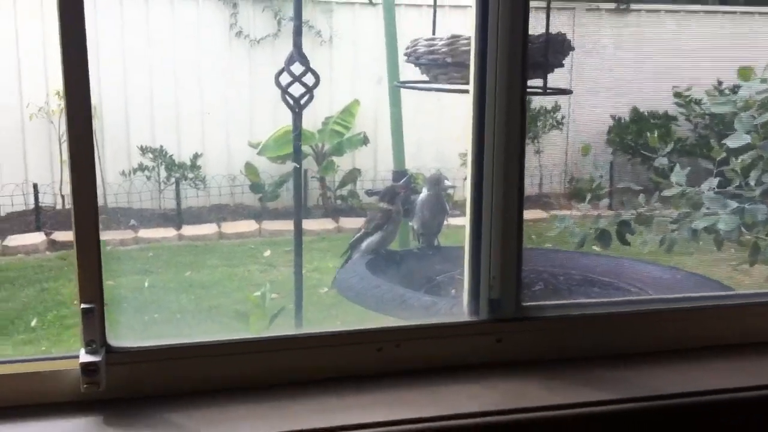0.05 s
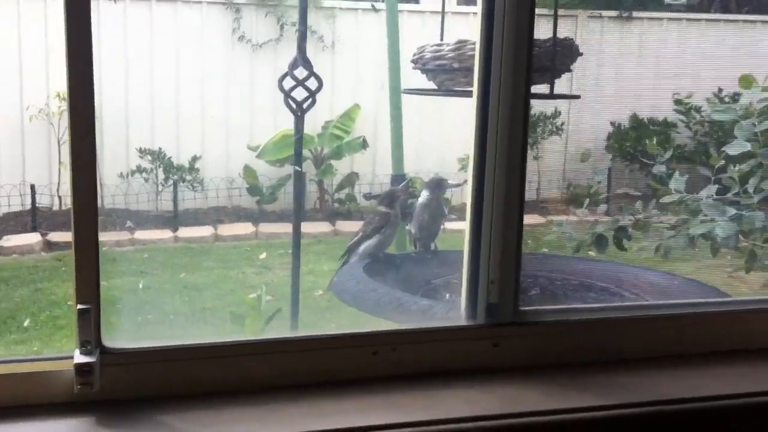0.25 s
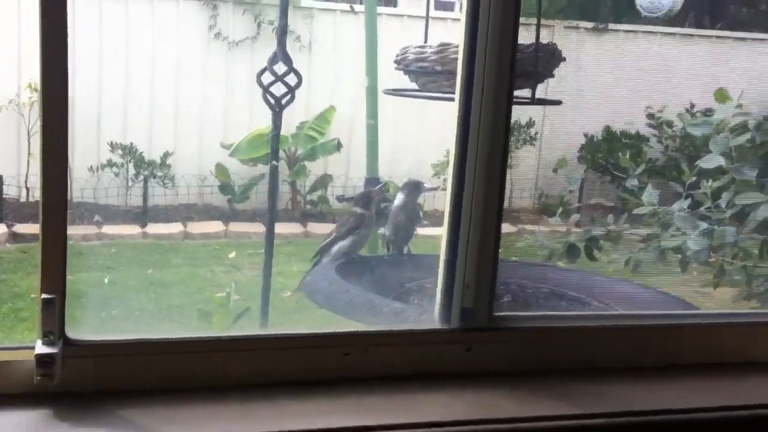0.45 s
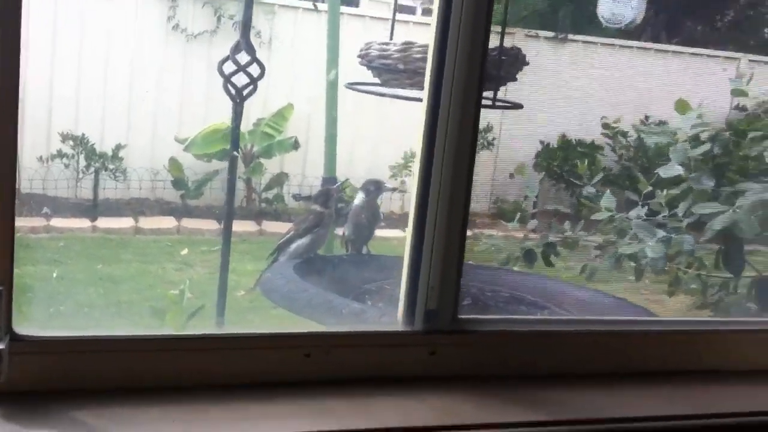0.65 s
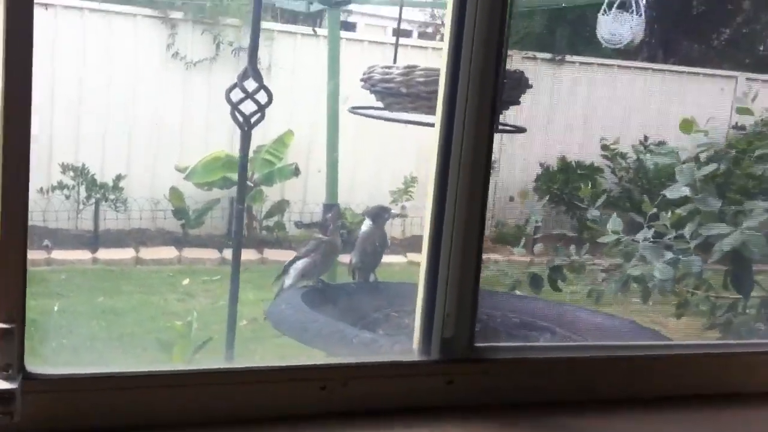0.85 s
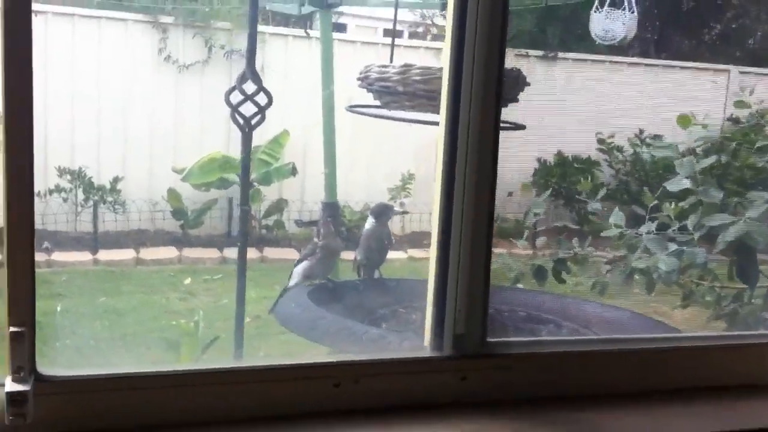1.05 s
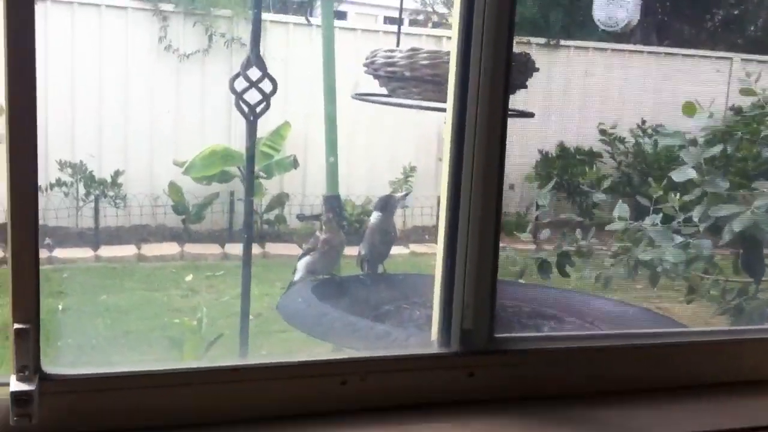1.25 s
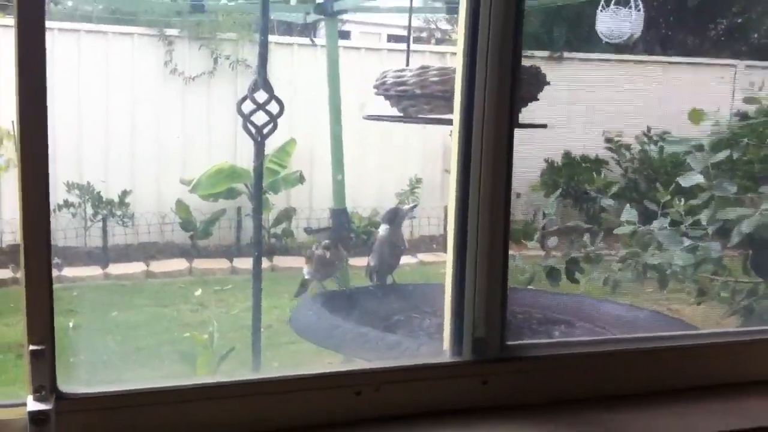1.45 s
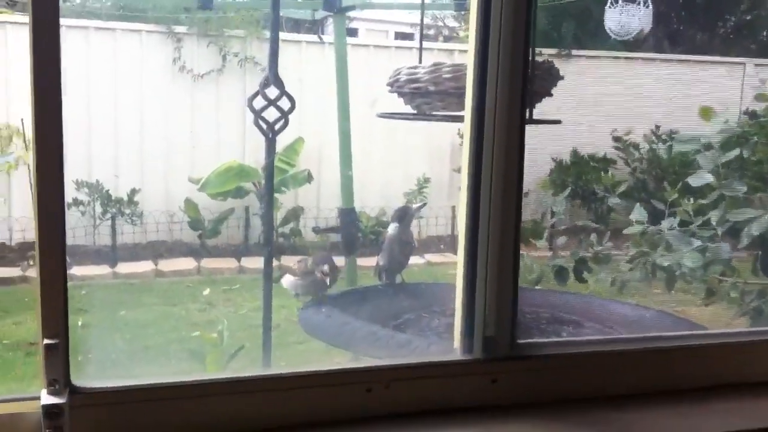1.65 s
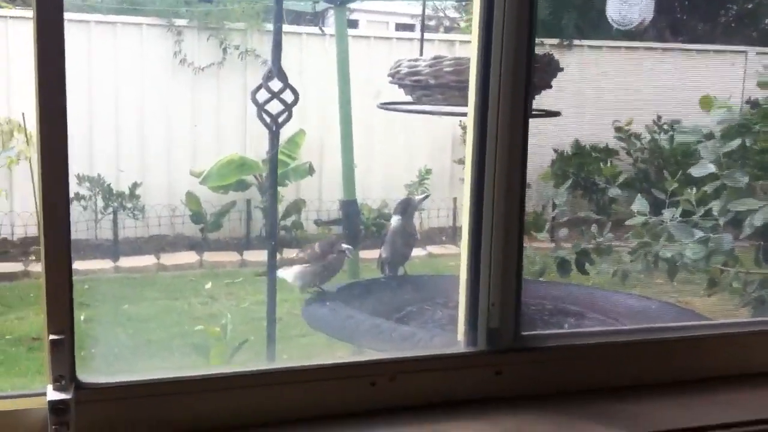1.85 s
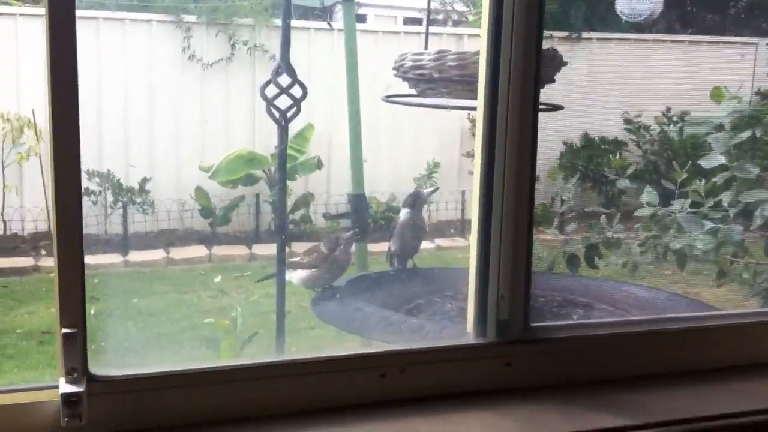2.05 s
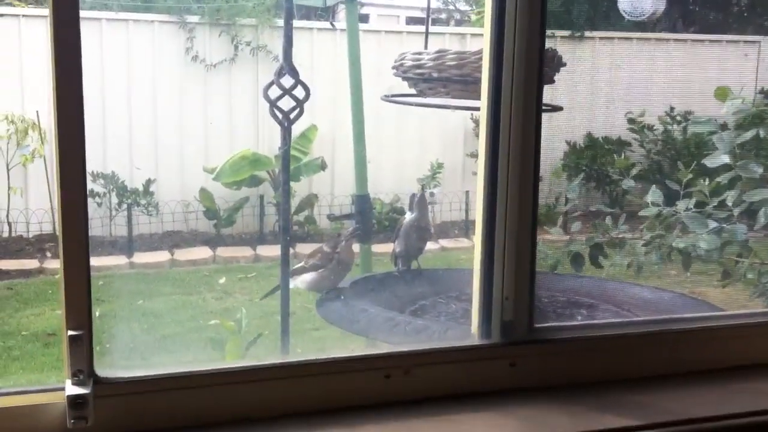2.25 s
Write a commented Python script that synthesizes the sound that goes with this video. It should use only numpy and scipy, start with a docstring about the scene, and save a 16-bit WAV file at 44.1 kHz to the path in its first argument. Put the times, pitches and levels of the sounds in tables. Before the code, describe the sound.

A young bird gives harsh, rising squawks in a garden, heard through a window.

```python
"""A young bird's begging squawks at a garden bird bath, heard from a microphone indoors behind a window.
Each squawk is a reedy tone from the syrinx that climbs in pitch, turns harsh on the way up and clears
at the top. One is dying away at the start and five more follow. Walls return them as early echoes and
a short ring; a quiet low rush and hum lie underneath."""
import sys
import numpy as np
from scipy import signal
from scipy.fft import rfft, irfft
from scipy.io import wavfile

SR = 44100
rng = np.random.default_rng(int(sys.argv[2]) if len(sys.argv) > 2 else 0)


def generate_wav(sig):
    """Save sig (samples, or channels by samples) to the path in sys.argv[1] as 16-bit PCM at SR."""
    pcm = np.round(np.clip(np.atleast_2d(sig).T, -1, 1) * 32767).astype(np.int16)
    wavfile.write(sys.argv[1], SR, pcm)


N = 105840
LEAD = SR // 4   # spare samples at each end, so a squawk can begin before 0 s
TIME = np.arange(-LEAD, N + LEAD) / SR
CUTOFF_HZ = 15750

# One curve a squawk. Each row: time in seconds, pitch in Hz, relative level in dB,
# roughness from 0 to 1, treble lift in dB.
FADING = [(-.12, 1350, -42.5, .5, 0), (-.06, 1614, -42, 0.42, -6), (-.025, 1650, -56.5, 0.2, 2)]
FIRST = [(.193, 1107, -47.5, 0.15, -8), (.207, 1148, -52, 0.089, 2), (.242, 1214, -44.5, 0.086, -6),
         (.272, 1253, -52, 0.26, -4), (.285, 1308, -45.5, 0.41, -4), (.303, 1386, -45.5, 0.53, -5),
         (.314, 1443, -38.5, 0.085, -1.5), (.335, 1509, -40, 0.19, -2.5), (.347, 1500, -46.5, 0.24, -2)]
SECOND = [(.836, 863, -59.5, 0.43, 7), (.856, 991, -48, 0.12, 7), (.897, 1055, -42.5, 0.062, 6),
          (.91, 1061, -48.5, 0.085, 12), (.972, 1199, -44.5, 0.13, -5), (1.012, 1309, -47, 0.44, -8),
          (1.042, 1429, -38, 0.19, 0), (1.056, 1446, -53.5, 0.62, 4)]
THIRD = [(1.405, 896, -67.5, 0.64, -7), (1.428, 1059, -46, 0.36, 5), (1.448, 1104, -49, 0.08, 8),
         (1.468, 1130, -42.5, 0.086, 1), (1.505, 1202, -43.5, 0.072, 0), (1.534, 1279, -48, 0.25, 2),
         (1.564, 1429, -41.5, 0.34, -4.5), (1.594, 1662, -41, 0.23, 0.5), (1.614, 1681, -51, 0.38, 0)]
FOURTH = [(1.733, 1144, -46.5, 0.15, 7.6), (1.744, 1166, -47.5, 0.2, 12), (1.758, 1207, -48.5, .12, 4),
          (1.785, 1239, -44, 0.2, 2), (1.816, 1354, -49, 0.39, 2.5), (1.848, 1463, -43, 0.2, 1),
          (1.864, 1517, -48.5, 0.11, 2.8)]
FIFTH = [(1.984, 1156, -50.5, 0.59, 3), (1.997, 1212, -47, 0.13, 11), (2.015, 1217, -42.5, 0.073, 5.4),
         (2.05, 1276, -46, 0.26, 8.9), (2.07, 1316, -48.5, 0.39, 8.4), (2.09, 1410, -44.5, 0.27, 5.8),
         (2.122, 1475, -54.5, .4, 3)]


def begging_bird():
    """The bird out at the bath: six squawks, each with its own climb and colour."""
    # Each row: curve, factor on the throat's resonance frequencies, extra dB on the fundamental,
    # then extra dB on harmonics 4, 6 and 8 early in the squawk.
    squawks = [(FADING, 1.0, 0, 0, 0, 0), (FIRST, 0.96, -1.7, -0.54, -4.5, -0.92),
               (SECOND, 0.97, 0, 3.4, 5.6, 1), (THIRD, 1.03, 0, 0.72, 0, -1.1),
               (FOURTH, 1.015, 0.42, 2.6, -0.5, -2), (FIFTH, 1.082, 2.3, 6.4, 1.3, 9.6)]
    return sum(squawk(*row) for row in squawks)


def squawk(curve, tuning, fundamental_db, fourth_db, sixth_db, eighth_db):
    """Syrinx harmonics sweep through the throat resonances; roughness shakes them and adds pulsed air."""
    # The syrinx. Each row: harmonic number, level in dB early in the squawk, level in dB at its top.
    harmonics = [(1, 2.5, -1), (2, 3, 2), (3, 0.5, -0.5), (4, 4.5, 2), (5, -1, 0), (6, 0, -0.5),
                 (7, -3.5, -4), (8, 0, 2), (9, -0.5, 0.5), (10, 0.5, 0.5)]
    # Throat and open beak. Each row: frequency in Hz before tuning, gain in dB.
    throat = [(600, 4), (1000, -7.5), (1250, -4.5), (1600, -9), (2100, -7.5), (2500, -6.5), (2850, -3.5),
              (3350, -7.5), (3750, -5.5), (4250, 0.5), (4850, -3), (5400, -10), (6100, -3.5), (7200, -7),
              (8400, -13), (9400, -17.5), (10500, -15), (12000, -16.5), (15500, -27.5)]
    # Air noise before the throat. Each row: frequency in Hz, relative level in dB.
    air_spectrum = [(1500, -13), (4000, 7), (8000, -1.5), (12000, 11)]
    # Each harmonic wavers on its own. Each row: frequency in Hz, spread in dB.
    flicker = [(1000, 1.2), (3000, 2), (8000, 3.5)]
    attack_s, release_s = .006, 0.017
    jitter, wobble = 0.044, 0.0048   # shares of the pitch: scatter at full roughness, constant waver
    shimmer_db, rasp_db, rasp_floor = 5.5, -7, 0.16   # the floor leaves some air in a clear tone

    times, *columns = np.transpose(curve)
    start, end = times[0], times[-1]
    span = (TIME > start - attack_s) & (TIME < end + release_s)
    t = TIME[span]
    n = len(t)
    pitch, level_db, rough, treble_db = [np.interp(t, times, column) for column in columns]

    def throat_db(hz, lift_db):
        return at_hz(throat, hz / tuning) + lift_db * at_hz([(9300, 0), (10500, 1)], hz)

    shake = jitter * rough * drift(n, rate_hz=440) + wobble * drift(n, rate_hz=70)
    phase = 2 * np.pi * np.cumsum(pitch * (1 + shake)) / SR
    orders = np.arange(1, 17)[:, None]
    harmonic_hz = orders * pitch

    # The colour turns just before halfway through the squawk.
    turn = np.interp((t - start) / (end - start), [0.4, 0.45], [0, 1])
    listed, early_db, top_db = np.transpose(harmonics)
    even_db = fourth_db * (orders == 4) + sixth_db * (orders == 6) + eighth_db * (orders == 8)
    source_db = (1 - turn) * (np.interp(orders, listed, early_db) + even_db)
    source_db += turn * np.interp(orders, listed, top_db) + fundamental_db * (orders == 1)
    flicker_db = at_hz(flicker, harmonic_hz) * np.array([drift(n, rate_hz=31.7) for _ in orders])
    gains = from_db(source_db + throat_db(harmonic_hz, treble_db) + flicker_db)
    gains *= harmonic_hz < CUTOFF_HZ + pitch
    tone = np.sum(gains * np.sin(orders * phase), axis=0) / np.sqrt(np.sum(gains ** 2, axis=0) / 2)

    puffs = rng.standard_normal(n) * (1 + np.cos(phase))   # one puff of air a cycle
    air = coloured(puffs, lambda hz: throat_db(hz, treble_db.mean()) + at_hz(air_spectrum, hz))
    rasp = from_db(rasp_db) * (rasp_floor + rough) * air
    shimmer = from_db(shimmer_db * rough * drift(n, rate_hz=193))
    gate = np.interp(t, [start - attack_s, start, end, end + release_s], [0, 1, 1, 0])
    out = np.zeros(len(TIME))
    out[span] = (tone + rasp) * shimmer * gate * from_db(level_db)
    return out


def walls(direct, echoes=14):
    """Direct sound reaches the microphone first, then early echoes and a ring, shorter in the treble."""
    # Each row: frequency in Hz, seconds the ring takes to fall 60 dB.
    ring_t60 = [(1000, 0.4), (3000, 0.35), (4500, 0.26), (7000, 0.32), (14000, 0.27)]
    echo_db, echo_spread_s = -5, .045
    ring_db, ring_rise_s = -5.5, 0.005
    t = np.arange(SR // 2) / SR
    signs = rng.choice([-1, 1], echoes)
    delays_s = rng.uniform(.001, echo_spread_s, echoes)
    early = np.zeros(len(t))
    early[(delays_s * SR).astype(int)] = signs / np.sqrt(echoes)

    edges_hz = np.geomspace(600, 17000, 9)
    ring = np.zeros(len(t))
    for low, high in zip(edges_hz, edges_hz[1:]):
        bandpass = signal.butter(2, [low, high], "band", fs=SR, output="sos")
        band = signal.sosfilt(bandpass, rng.standard_normal(len(t)))
        ring += band * from_db(-60 * t / at_hz(ring_t60, np.sqrt(low * high)))
    ring = unit_power(ring * np.minimum(t / ring_rise_s, 1)) / np.sqrt(len(t))
    response = from_db(echo_db) * early + from_db(ring_db) * ring
    return direct + signal.fftconvolve(direct, response)[:len(direct)]


def background(rush_db=-62.5, hum_drift_hz=2.53, hum_waver_db=2):
    """The quiet of the place: a steady low rush with faint hiss, and a wavering hum."""
    # The rush. Each row: frequency in Hz, relative spectral density in dB.
    rush = [(20, -40), (32, -15), (40, -18), (58, -3.5), (72, -5), (95, -20), (135, -3.5), (170, -3),
            (205, 7), (260, 0.5), (330, 0), (460, -0.5), (600, -0.5), (800, -6), (1300, -10.5), (2500, -13),
            (6000, -20), (11000, -20.5), (15500, -21.5)]
    # The hum's tones. Each row: frequency in Hz, level in dB.
    hum = [(258.4, -73), (387.6, -70), (565, -79.5)]
    n = len(TIME)
    out = from_db(rush_db) * coloured(rng.standard_normal(n), lambda hz: at_hz(rush, hz))
    for hz, db in hum:
        phase = 2 * np.pi * np.cumsum(hz + hum_drift_hz * drift(n, rate_hz=7)) / SR
        out += np.sqrt(2) * from_db(db + hum_waver_db * drift(n, rate_hz=7)) * np.sin(phase)
    return out


def from_db(db):
    """Decibels to gain."""
    return 10 ** (np.asarray(db) / 20)


def unit_power(x):
    """Scale to a mean square of 1."""
    return x / np.sqrt(np.mean(x ** 2) + 1e-20)


def at_hz(points, hz):
    """Read a table on a log-frequency axis."""
    frequencies, values = np.transpose(points)
    return np.interp(np.log(np.maximum(hz, 1)), np.log(frequencies), values)


def drift(size, rate_hz):
    """A smooth random wander with a spread of about 1."""
    pole = np.exp(-2 * np.pi * rate_hz / SR)
    wander = signal.lfilter([1], [1, -2 * pole, pole * pole], rng.standard_normal(size + LEAD))
    return unit_power(wander[LEAD // 2:])[-size:]


def coloured(noise, db_at):
    """Give a noise the spectrum db_at(Hz), at unit power."""
    hz = np.arange(len(noise) // 2 + 1) * SR / len(noise)
    return unit_power(irfft(rfft(noise) * from_db(db_at(hz)), len(noise)))


def scene():
    """From the spot indoors, in mono: the bird and its echoes over the background."""
    mix = from_db(-2.0) * walls(begging_bird()) + background()
    return mix[None, LEAD:LEAD + N]


def record(dry):
    """A steep low-pass cuts the highest treble from the microphone's signal."""
    return signal.sosfilt(signal.ellip(12, .1, 80, CUTOFF_HZ, fs=SR, output="sos"), dry)


dry = scene()
out = record(dry)
generate_wav(out)
```